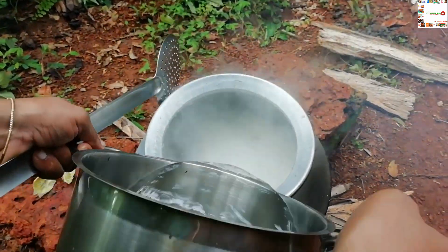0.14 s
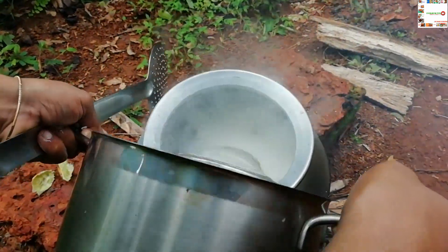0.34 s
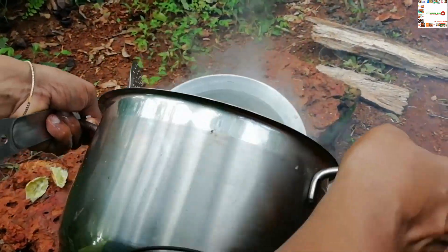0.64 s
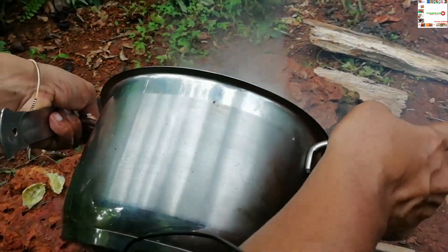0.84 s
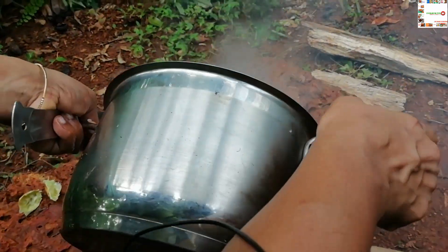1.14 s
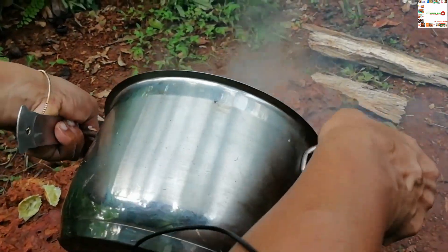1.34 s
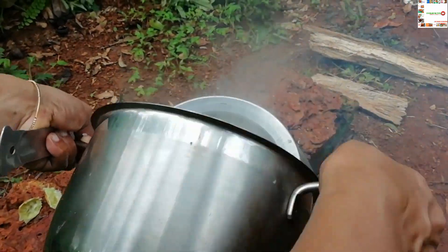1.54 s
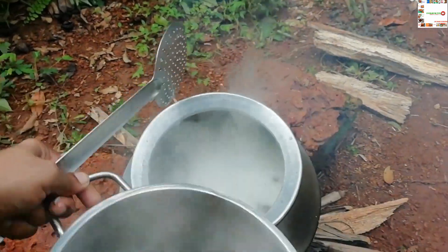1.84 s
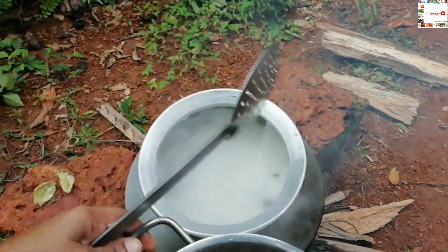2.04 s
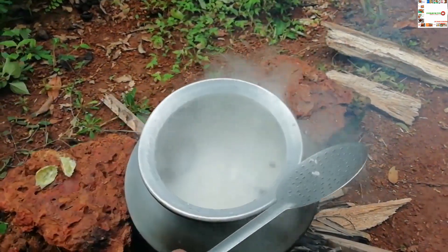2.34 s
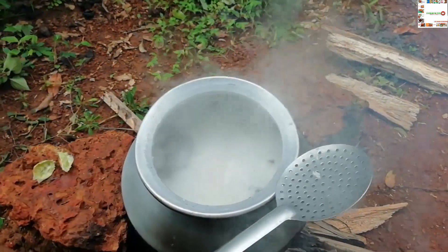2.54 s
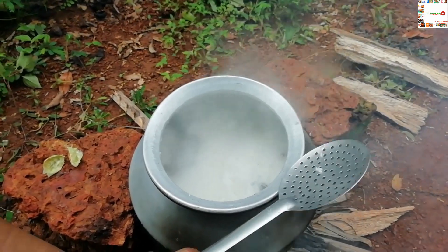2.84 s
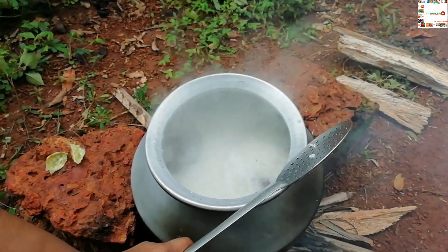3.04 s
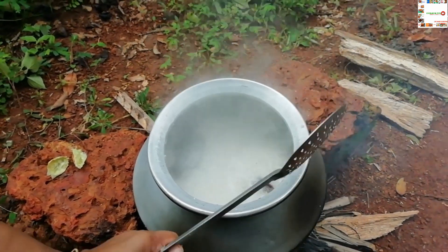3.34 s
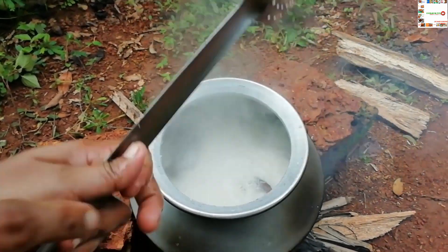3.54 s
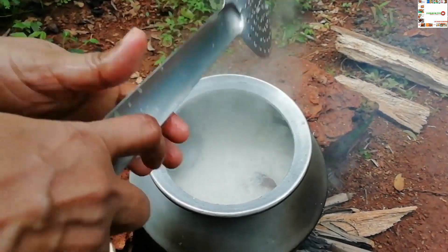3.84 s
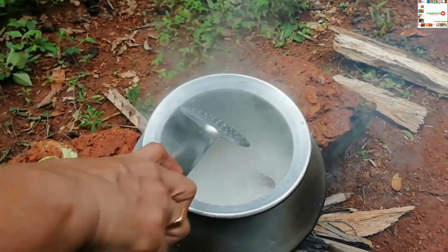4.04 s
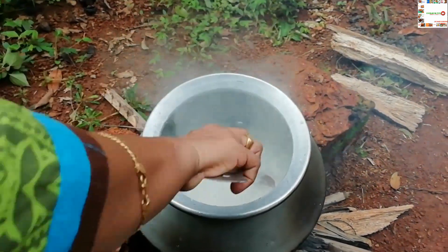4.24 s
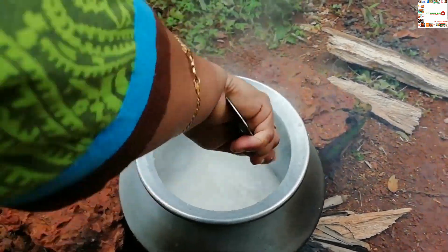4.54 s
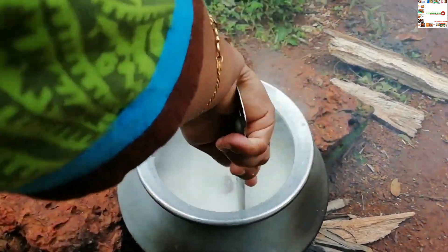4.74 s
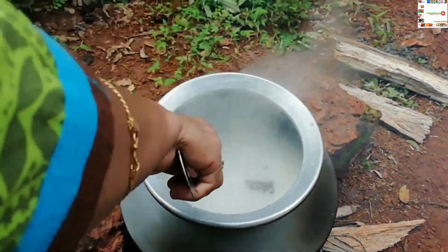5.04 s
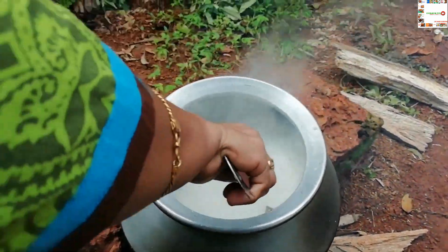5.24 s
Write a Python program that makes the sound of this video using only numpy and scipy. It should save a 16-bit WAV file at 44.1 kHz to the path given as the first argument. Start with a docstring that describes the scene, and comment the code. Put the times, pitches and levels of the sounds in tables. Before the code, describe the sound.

Water is poured from a steel pot into a simmering pot with splashes and glugs, then metal clangs and rattles, and a ladle knocks and stirs.

```python
"""Outdoors, hot water is tipped from a steel pot into an aluminium pot of boiling rice: swarms of
bubbles ring in a hollow, with glugs, slaps and drips, and the rest runs back as the pot is righted.
A perforated ladle is dropped across the rim, then the empty steel pot clatters down and rattles:
decaying modes. The ladle knocks the rim and stirs the rice. Throughout, light wind buffets the close
microphone as low filtered noise, over a faint hiss."""
import sys
import numpy as np
from scipy import signal
from scipy.fft import rfft, irfft
from scipy.io import wavfile
from scipy.ndimage import uniform_filter1d

SR = 44100
rng = np.random.default_rng(int(sys.argv[2]) if len(sys.argv) > 2 else 0)


def file_out(sig):
    """Save sig as 16-bit WAV at sys.argv[1]."""
    # one column per channel
    cols = np.atleast_2d(sig).T
    # limit, then scale
    lim = np.clip(cols, -1, 1)
    pcm = np.round(lim * 32767).astype(np.int16)
    wavfile.write(sys.argv[1], SR, pcm)


N = 237302
TIME = np.arange(N) / SR
USUAL_FLOW_DB = -50  # the layers' growth with flow is reckoned from here

# The crowded higher modes of thin metal. Each row: frequency in Hz, density in dB per Hz.
CLASH_SPECTRUM = [(600, -21), (1000, -34.5), (1250, -9.5), (1700, -1), (2450, -8.5), (3100, -1.5),
                  (4500, -6), (5200, -7), (6000, -2.5), (6500, -7.5), (7400, -2.5), (9300, -5),
                  (10400, -14.5), (15000, -17)]


def gain_of(db):
    """A level in decibels is twenty times the logarithm of an amplitude factor."""
    return 10 ** (np.asarray(db) / 20)


def evened(x):
    """Normalization: the root mean square is brought to 1."""
    return x / np.sqrt(np.mean(x ** 2) + 1e-20)


def steadied(x, span_s):
    """Envelope division: the running rms is held near 1 while grain faster than the span remains."""
    return x / np.sqrt(abs(uniform_filter1d(x ** 2, int(span_s * SR))) + 1e-9)


def coloured(x, points, tilt_db=0):
    """Linear filtering: x is given a spectrum, tilted in dB per octave about 3 kHz, at rms 1."""
    hz = np.fft.rfftfreq(len(x), 1 / SR) + 1  # the offset avoids the logarithm of zero
    point_hz, point_db = np.transpose(points)
    octaves_above = np.maximum(np.log2(hz / point_hz[-1]), 0)
    octaves_below = np.maximum(np.log2(point_hz[0] / hz), 0)
    shape_db = np.interp(np.log(hz), np.log(point_hz), point_db)
    shape_db = shape_db - 24 * (octaves_above + octaves_below) + tilt_db * np.log2(hz / 3000)
    return evened(irfft(rfft(x) * gain_of(shape_db), len(x)))


def dying(t, t60):
    """Exponential decay: the amplitude falls 60 dB in t60 seconds."""
    return np.exp(-np.log(1000) * t / t60)


def add(mix, s, sound):
    """Superposition: a sound is summed into the mix from s seconds on."""
    part = mix[max(round(s * SR), 0):][:len(sound)]
    part += sound[:len(part)]


def resonate(x, hz, width):
    """Resonance of unit gain: a one-pole filter in a frame that rotates with the frequency curve."""
    turn = np.exp(2j * np.pi * np.cumsum(hz) / SR)
    radius = np.exp(-np.pi * width / SR)
    return 2 * (turn * signal.lfilter([1 - radius], [1, -radius], x / turn)).real


def bubble(hz, t60, rise, onset_cycles=0.92):
    """Bubble oscillation: a damped sine whose pitch rises (octaves per s) as it nears the surface."""
    t = TIME[:int(t60 * SR) + 16]
    phase = 2 * np.pi * np.cumsum(hz * 2 ** (rise * t)) / SR
    onset = 1 - np.exp(-(t * hz / onset_cycles) ** 2)
    return np.sin(phase) * dying(t, t60) * onset


def gulps(rows, onset_cycles, rise_octaves):
    """Damped oscillation: short rounded rings, their pitch rising by a set interval within t60."""
    out = np.zeros(N)
    for s, db, hz, t60 in rows:
        add(out, s, gain_of(db) * bubble(hz, t60, rise_octaves / t60, onset_cycles))
    return out


def outdoor_air():
    """Stationary broadband noise: a faint outdoor hiss, strongest in its low frequencies."""
    # Each row: frequency in Hz, density in dB per Hz.
    air_spectrum = [(120, -17.5), (200, -2.5), (294, -4.5), (380, -5), (601, -16), (671, -7.5), (821, -9.5),
                    (968, -7), (2650, -14), (8740, -21), (10700, -26.5), (14900, -30), (16000, -40.5)]
    return gain_of(-56) * coloured(rng.standard_normal(N), air_spectrum)


def wind(gust_heave_db=5.5, calm_flutter_db=-57, gust_edge_s=0.077):
    """Turbulence: eddies push the microphone in slow heaves, with a flutter that rises in each gust."""
    # Slow buffeting and faster flutter. Each row: frequency in Hz, density in dB per Hz.
    buffet_spectrum = [(3, -13.5), (9, 5), (18, 1.5), (30, -11), (55, -18), (90, -42)]
    flutter_spectrum = [(30, -4.5), (60, 5.5), (110, -4.5), (180, -10.5), (300, -24), (600, -36)]
    # The breeze swells and sinks. Each row: time in seconds, buffeting level in dB.
    breeze = [(0.0, -48), (0.55, -45), (1.7, -43.5), (2.45, -33), (2.9, -38.5), (3.7, -32), (4.1, -37.5),
              (4.85, -34), (5.38, -51.5)]
    # Gusts that flutter on the microphone. Each row: start in seconds, length in seconds, level in dB.
    gust_rows = [(0.498, 0.2, -50), (0.853, 0.31, -47), (1.246, 0.21, -41.5), (2.345, 0.35, -54),
                 (3.091, 0.867, -44), (4.137, 0.43, -46.5), (4.68, 0.16, -53)]
    gusts = np.zeros(N)
    for start, length, db in gust_rows:
        to_nearer_end = np.minimum(TIME - start, start + length - TIME)
        gusts += gain_of(db) * np.clip(to_nearer_end / gust_edge_s, 0, 1)
    heave = gain_of(np.interp(TIME, *np.transpose(breeze)))
    slow, fast = rng.standard_normal((2, N))
    buffeting = steadied(coloured(slow, buffet_spectrum), 0.17)
    flutter = steadied(coloured(fast, flutter_spectrum), 0.12)
    # powers add
    buffeting *= np.hypot(heave, gain_of(gust_heave_db) * gusts)
    flutter *= np.hypot(gain_of(calm_flutter_db), gusts)
    return buffeting + flutter


def puffs():
    """Damped oscillation: each sudden puff of air is a low ring of steady pitch."""
    # Each row: start in seconds, level in dB, pitch in Hz, t60 in seconds.
    puff_rows = [(1.308, -28.5, 104, 0.075), (1.348, -26, 66.4, 0.057), (2.574, -6, 32.7, 0.11),
                 (3.163, -19.5, 66.6, 0.068)]
    return gulps(puff_rows, onset_cycles=0.36, rise_octaves=0)


def clash_colour(bright_hz, lift_db=5, octaves=0.58):
    """Modal excitation: the point of contact favours one group of the crowded modes."""
    point_hz, point_db = np.transpose(CLASH_SPECTRUM)
    hz = np.geomspace(point_hz[0], point_hz[-1], 128)
    favour_db = lift_db * np.exp(-(np.log2(hz / bright_hz) / octaves) ** 2)
    return np.transpose([hz, np.interp(np.log(hz), np.log(point_hz), point_db) + favour_db])


def scraping():
    """Friction excitation: uneven slips keep the thin metal sounding between the blows."""
    # Metal dragging over metal. Each row: start in seconds, length in seconds, level in dB,
    # brightest frequency in Hz.
    scrape_rows = [(2.684, 0.2, -30.5, 1310), (3.054, 0.12, -38.5, 1460), (3.122, 0.08, -49.5, 2150)]
    out = np.zeros(N)
    size = 16384
    for s, length, db, bright_hz in scrape_rows:
        # tiny rebounds make the level of the contact uneven
        unevenness = coloured(rng.standard_normal(size), [(40, 9.5), (300, -13.5), (700, -7)])
        slips = rng.standard_normal(size) * evened(gain_of(5 * unevenness))
        sound = coloured(slips, clash_colour(bright_hz, lift_db=6.0), tilt_db=-4.5)
        sound = sound[:int(length * SR)]
        add(out, s, gain_of(db) * sound * signal.windows.tukey(len(sound), .4))
    return out


def struck(modes, t, length, build_s, chance_db, detune=.0015):
    """Modal superposition: close pairs of modes beat and decay, sooner when a hand damps the object."""
    hz, db, t60 = np.transpose(modes)[:, :, None]
    phase = rng.random(hz.shape)  # in turns
    # each contact weights and detunes the modes a little
    strength, shift, split = rng.standard_normal((3, *hz.shape))
    turns = hz * (1 + detune * shift) * t + phase
    pair = np.sin(2 * np.pi * turns) + .35 * np.cos(2 * np.pi * (turns + 25 * split * t))
    onset = 1 - np.exp(-(t / build_s) ** 2)
    partials = gain_of(db + chance_db * strength) * pair * onset
    return (partials * dying(t, t60 * length)).sum(0)


def metal(thud_db=-11, thud_t60=0.089, shimmer_t60=0.36, uneven_db=2.0):
    """Impact excitation: a blow wakes a clash, a thud, a shimmer and clear modes; harder is brighter."""
    # Metal blows. Each row: start in seconds, strength in dB, t60 of the clash in seconds,
    # its brightest frequency in Hz, kind of contact.
    blows = [(2.2548, -13, 0.12, 7300, "ladle lands"), (2.3131, -5.5, 0.042, 4570, "ladle bounces"),
             (2.324, -14.5, 0.11, 3800, "ladle settles"), (2.6663, -8.5, 0.063, 1330, "steel pot lands"),
             (2.680, -14, 0.067, 1300, "steel pot lands"), (2.699, -21, 0.15, 2000, "steel pot lands"),
             (2.7447, -16, 0.043, 7500, "steel pot lands"), (2.7723, -16, 0.08, 2105, "steel pot lands"),
             (2.8124, -20, 0.048, 1690, "steel pot lands"), (2.8262, -6, 0.041, 1590, "both pots rattle"),
             (2.8539, -11.5, 0.12, 1620, "both pots rattle"), (2.868, -16, 0.14, 3630, "both pots rattle"),
             (3.004, -34.5, 0.41, 7740, "steel pot lands"), (3.0397, -13.5, 0.059, 1680, "steel pot rattles"),
             (3.066, -22, 0.05, 2120, "dull bump"), (3.097, -19.5, 0.084, 1570, "steel pot rattles"),
             (3.117, -23.5, 0.041, 1550, "steel pot rattles"), (3.2009, -15.5, 0.085, 1720, "steel pot rattles"),
             (3.328, -28, 0.053, 1770, "both pots rattle"), (4.187, -8.5, 0.032, 2930, "knock inside"),
             (4.1893, -13, 0.036, 3180, "dull bump")]
    # Ways the metal meets. Each entry: tilt in dB per octave, thud in dB, thud pitch in Hz, shimmer in dB,
    # ring in dB of the ladle, of the steel pot and of the rice pot, ring length as a factor (short when
    # a hand damps it). Levels are relative to the blow, the thud's before the common thud_db.
    contacts = {"ladle lands": (3.0, -9.5, 388.5, -19.5, 10.5, -48.5, -43.5, 1.57),
                "ladle bounces": (-3, -6, 604, -24, -21.5, -25.5, -22, 1.6),
                "ladle settles": (-1.1, -4.5, 784, -13, -10, -45, -21.5, 0.7),
                "steel pot lands": (-0.5, -3.5, 621, -21, -39.5, -8.5, -22.5, 0.77),
                "both pots rattle": (-3, -19.5, 673, -21, -47.5, -24, -21.5, 1.53),
                "steel pot rattles": (-1.5, -6.5, 562, -22, -31, -10.5, -15, 0.8),
                "knock inside": (-2.5, 1, 790, -22, -51, -38, -14, 1.01),
                "dull bump": (-2.2, 1, 382, -22.5, -55, -47.5, -27, 0.9)}
    # Modes of each object. Each row: frequency in Hz, level in dB, t60 in seconds before the ring length.
    ladle_modes = [(1246, 0, .085), (1238, -34, .7), (2492, -31, .35), (2858, -22, .48), (3947, -28, .25),
                   (4128, -27, .33), (4412, -5, .055), (4407, -25, .42), (5010, -23, .13), (5287, -24, .13),
                   (5713, -20, .13), (5959, -18, .12), (6737, -11, .12), (6869, -28, .33), (7616, -17, .1),
                   (8103, -16, .09), (8255, -27, .2), (9167, -18, .06)]
    steel_pot_modes = [(545, -15, 0.1), (889, -17, 0.52), (1150, -5, 0.077), (1250, -6, 0.28),
                       (1350, 3, 0.14), (1389, 0.5, 0.12), (1643, -7.5, 0.16), (1890, -4.5, .15),
                       (2087, -4, 0.22), (2790, -5, 0.13), (3064, 4.5, 0.071), (3510, -12.5, 0.25),
                       (4350, -32, 0.37), (4414, -17.5, 0.45), (4810, -3.5, 0.085), (6040, -10.5, 0.065),
                       (5900, -12.5, 0.29), (7220, -2.5, 0.13), (7830, 1.5, 0.085)]
    rice_pot_modes = [(407, -8, 0.056), (797, -6.5, 0.059), (1120, -16.5, 0.33), (1290, -8.5, 0.23),
                      (1494, -14, .2), (1605, -4, 0.18), (1685, -14.5, 0.43), (1910, -30, 0.21),
                      (2125, -17.5, 0.16), (2950, 4, 0.047), (2860, 4, 0.025), (3280, -6, 0.18),
                      (3600, 1.5, 0.077), (3680, -11, .12), (4525, -10.5, 0.26), (4550, -10, .12),
                      (5200, -12.5, .16), (5630, -6.5, 0.2), (7570, 1, 0.073), (7440, -13, 0.14),
                      (8470, -6.5, 0.18), (8720, -9, 0.18)]
    # Spectrum of the thud. Each row: frequency as a multiple of its pitch, density in dB per Hz.
    thud_spectrum = [(.15, -4), (.5, -16), (1, 3), (1.35, -12), (2, -3.5), (4, -16.5)]
    usual_blow_db = -13
    harder_tilt = 0.21  # dB per octave brighter for each dB of strength
    out, t = np.zeros(N), TIME[:24576]
    for s, db, t60, bright_hz, contact in blows:
        contact_tilt_db, low_db, thud_hz, shimmer_db, ladle_db, steel_db, rice_db, length = contacts[contact]
        tilt_db = contact_tilt_db + harder_tilt * (db - usual_blow_db)
        bright, dull, late = rng.standard_normal((3, len(t)))
        colour = clash_colour(bright_hz)
        colour[:, 1] += uneven_db * rng.standard_normal(len(colour))  # no two blows wake the same modes
        clash = coloured(bright, colour, tilt_db) * dying(t, t60)
        thud = coloured(dull, np.array(thud_spectrum) * [thud_hz, 1]) * dying(t, thud_t60)
        thud *= gain_of(thud_db + low_db)
        shimmer = coloured(late, CLASH_SPECTRUM, tilt_db - 2.5) * dying(t, shimmer_t60)
        shimmer *= gain_of(shimmer_db)
        ladle = gain_of(ladle_db) * struck(ladle_modes, t, length, build_s=0.0059, chance_db=0.0)
        steel = gain_of(steel_db) * struck(steel_pot_modes, t, length, build_s=0.0021, chance_db=3.5)
        rice = gain_of(rice_db) * struck(rice_pot_modes, t, length, build_s=0.001, chance_db=-3.5)
        add(out, s, gain_of(db) * (clash + thud + shimmer + ladle + steel + rice))
    return out


def singing_wall(width_hz=180):
    """Narrow-band resonance: water swirling in the tilted steel pot sets its wall singing in fuzzy glides."""
    # Each row: start in seconds, end in seconds, level in dB, first pitch in Hz, last pitch in Hz.
    singing_rows = [(0, 0.41, -62, 1640, 1700), (.76, 1.008, -51.5, 1390, 1430),
                    (1.77, 2.2, -58, 2950, 2630), (1.86, 2.228, -54.5, 1880, 1620)]
    out = np.zeros(N)
    for start, end, db, first_hz, last_hz in singing_rows:
        size = int((end - start) * SR)
        glide = np.linspace(first_hz, last_hz, size)
        tone = resonate(rng.standard_normal(size), glide, width_hz)
        tone = resonate(tone, glide, width_hz)
        add(out, start, gain_of(db) * evened(tone) * signal.windows.tukey(size, .4))
    return out


def bubbles(low_hz, high_hz, per_s, cycles, spread_db, count=24):
    """Random superposition: a swarm of small bubbles at chance moments, most faint and a few large."""
    out = np.zeros(N)
    for hz in np.geomspace(low_hz, high_hz, count):
        place, chance = rng.random((int(per_s * N / SR / count) + 1, 2)).T
        strength = gain_of(spread_db * np.minimum(-np.log(1 - chance), 4))
        train = np.bincount((place * N).astype(int), strength, N)
        t60 = cycles * rng.uniform(0.21, 2.36) / hz
        ring = bubble(hz, t60, 0.12 / t60)
        out += signal.oaconvolve(train, ring / np.linalg.norm(ring) * np.sqrt(hz))[:N]
    return evened(out)


def water(flow_db, hollow_hz, deep_db, splash_db, spray_db, spray_growth, hollow_db, hollow_growth,
          hollow_width, gush_db, lumpy_db):
    """Bubble noise and cavity resonance: clumped bubbles ring the pot's hollow; layers grow with the flow."""
    # Spectra of drops, mist, hollow and gurgle. Each row: frequency in Hz, density in dB per Hz.
    splash_spectrum = [(900, -37.5), (1800, -9), (2500, -2.5), (4000, -1.5), (5500, -3), (7000, -12.5),
                       (10000, -24)]
    spray_spectrum = [(3500, -43), (5500, -10), (7000, 2.5), (9200, 1), (10300, -13.5), (15000, -14),
                      (16500, -25.5)]
    hollow_spectrum = [(300, -22), (700, -5.5), (1100, -8), (2200, -7), (3200, -12.5), (5000, -30)]
    churn_spectrum = [(100, 8.5), (230, -9.5), (350, 3.5), (480, -7.5), (700, -20), (1200, -30)]
    lumps = coloured(rng.standard_normal(N), [(10, -1), (70, -15.0), (200, -13)])
    clumps = gain_of(lumpy_db * lumps)
    drops = coloured(bubbles(1700, 7000, 4500, 36, 3.7, count=40) * clumps, splash_spectrum)
    mist = coloured(bubbles(5000, 15500, 6000, 24, 3.6) * clumps, spray_spectrum)
    gush = coloured(bubbles(600, 3600, 2000, 14, 3.8), hollow_spectrum)
    ringing = resonate(gush, hollow_hz, hollow_width)
    ringing = evened(resonate(ringing, hollow_hz, hollow_width))
    cavity = ringing + gain_of(gush_db) * gush
    gurgle = coloured(bubbles(222.0, 855, 300, 10.0, 2.8), churn_spectrum)
    excess_db = flow_db - USUAL_FLOW_DB
    layers = [(drops, flow_db + splash_db),
              (mist, spray_db + spray_growth * excess_db),
              (cavity, hollow_db + hollow_growth * excess_db),
              (gurgle, deep_db)]
    return sum(steadied(x, 0.095) * gain_of(db) for x, db in layers)


def stream(points):
    """Interpolation of a flow: its level and hollow pitch, falling 100 dB per second outside its span."""
    s, flow_db, hollow_hz = np.transpose(points)
    outside_s = abs(TIME - np.clip(TIME, s[0], s[-1]))
    return np.interp(TIME, s, flow_db) - 100 * outside_s, np.interp(TIME, s, hollow_hz)


def stirring(churn_db=-5, attack_s=0.0048, settle_t60=0.13):
    """Forced motion and decay: each stroke moves the water at once, keeps it up and lets it settle."""
    # Strokes of the ladle through the rice. Each row: start in seconds, length in seconds, flow in dB,
    # pitch of the hollow in Hz, deep churning in dB before churn_db.
    strokes = [(4.49, 0.17, -38.5, 1880, -45.5), (4.689, 0.02, -42, 1780, -31),
               (4.777, 0.063, -46, 1780, -29), (4.91, 0.11, -54.5, 2190, -61),
               (5.028, 0.33, -74.5, 1590, -69), (5.288, 0.013, -61.5, 1760, -44)]
    flow, deep = np.full((2, N), 1e-6)  # a floor for the logarithm
    for start, length, db, _, deep_db in strokes:
        attack = np.clip((TIME - start) / attack_s, 0, 1)
        push = attack * dying(np.maximum(TIME - start - length, 0), settle_t60)
        flow = flow + gain_of(db) * push
        deep = deep + gain_of(deep_db) * push
    start, length, _, hz, _ = np.transpose(strokes)
    hollow_hz = np.interp(TIME, start + length / 2, hz)
    return water(20 * np.log10(flow), hollow_hz, 20 * np.log10(deep) + churn_db, splash_db=-2.5,
                 spray_db=-56, spray_growth=0.39, hollow_db=-48.5, hollow_growth=0.7,
                 hollow_width=580, gush_db=-17.5, lumpy_db=2.5)


def dripping():
    """Bubble entrainment: each last drop off the lip traps a small bubble that plops, rising in pitch."""
    # Each row: start in seconds, level in dB, pitch in Hz, t60 in seconds, rise in octaves per second.
    drips = [(1.447, -37, 1930, 0.032, 2), (1.467, -39.5, 3340, 0.027, 2), (1.591, -39, 1920, 0.045, 3),
             (2.051, -37, 956, 0.18, 10.5)]
    out = np.zeros(N)
    for s, db, hz, t60, rise in drips:
        add(out, s, gain_of(db) * bubble(hz, t60, rise, onset_cycles=3.5))
    return out


def backwash(churn_db=-8):
    """Bubble noise in a cavity: the rest of the water slops back as the steel pot is righted."""
    # Each row: time in seconds, flow in dB, pitch of the hollow in Hz.
    backwash_points = [(1.75, -60, 1820), (1.87, -53, 1480), (1.94, -41.5, 1340), (2.02, -54, 1680),
                       (2.23, -58.5, 1650)]
    flow_db, hollow_hz = stream(backwash_points)
    return water(flow_db, hollow_hz, flow_db + churn_db, splash_db=-0.5,
                 spray_db=-53.5, spray_growth=1.68, hollow_db=-54.0, hollow_growth=0.99,
                 hollow_width=700, gush_db=-3, lumpy_db=1.5)


def glugs():
    """Bubble oscillation: large air pockets close and ring low, rising in pitch."""
    # Each row: start in seconds, level in dB, pitch in Hz, t60 in seconds.
    glug_rows = [(.625, -29.5, 355, 0.039), (.657, -25, 258, 0.028), (.731, -29.5, 430, 0.025),
                 (.897, -17.5, 344, 0.019), (.982, -34, 425, 0.042), (1.073, -29, 388, 0.034),
                 (1.401, -31, 210, 0.027), (1.891, -23, 286, 0.018), (4.492, -21, 365, 0.024),
                 (4.574, -22.5, 425, 0.071), (4.621, -22.5, 424, 0.097), (4.673, -24.5, 368, 0.072),
                 (4.703, -21, 344, 0.077), (4.789, -31, 329, 0.15), (4.795, -35, 200, 0.035),
                 (4.790, -24.5, 717, 0.057), (4.828, -33, 380, 0.088), (4.852, -24.5, 340, 0.05)]
    return gulps(glug_rows, onset_cycles=0.54, rise_octaves=0.14)


def spats(crest_db=6, dulling_db=-12, octaves=0.57, t60=0.02):
    """Impact noise: each slap of water or small tap is a short burst about its own pitch, dulled on top."""
    # Each row: start in seconds, peak in dB (nominal, crest_db above the burst's rms), centre in Hz.
    spat_rows = [(0.2813, -35.5, 6460), (0.626, -22, 6400), (0.6288, -17, 7160), (0.677, -28, 8250),
                 (0.7823, -26, 5240), (0.801, -26.5, 3100), (1.1077, -32, 6240), (1.125, -23.5, 4570),
                 (1.199, -25.5, 7400), (1.365, -29.5, 7250), (1.400, -36, 745), (1.83, -23, 1260),
                 (1.831, -25, 5500), (1.9711, -23.5, 3220), (2.049, -29.5, 1200), (2.6172, -25.5, 4340),
                 (4.4923, -23.5, 2240), (4.641, -23, 3300), (4.71, -22, 2380), (4.833, -25.5, 2750),
                 (4.854, -21, 6050), (4.993, -27, 3120), (5.293, -31, 1460)]
    out, t = np.zeros(N), TIME[:4096]
    hz = np.geomspace(100, 16000, 64)
    top_db = dulling_db * np.clip((hz - 9300) / 1200, 0, 1)
    for s, db, centre_hz in spat_rows:
        band_db = top_db - 6 * abs(np.log2(hz / centre_hz) / octaves) ** 1.42
        burst = coloured(rng.standard_normal(len(t)), np.transpose([hz, band_db]))
        add(out, s, gain_of(db - crest_db) * burst * dying(t, t60))
    return out


def first_sheet(start=0.31, fullest=0.51, end=0.59, db=-43.5):
    """Broadband noise: the first smooth sheet of water lands with a rush that swells and stops."""
    spectrum = [(450, -21), (850, -2.0), (1100, -4), (1900, -2), (2600, -15.5), (5000, -11), (8000, -38)]
    rush = coloured(rng.standard_normal(N), spectrum)
    return gain_of(db) * rush * np.interp(TIME, [start, fullest, end], [0, 1, 0])


def plinks(flow_db, start=0.63, end=1.64, db=-55, growth=0.33):
    """Sparse bubble oscillation: larger drops ring above the stream and remain as it thins to drips."""
    drops = steadied(bubbles(1870, 4700, 90, 40, 4.0, count=30), 0.29)
    falling = np.interp(TIME, [start - .05, start, end, end + .05], [0, 1, 1, 0])
    return drops * falling * gain_of(db + growth * (flow_db - USUAL_FLOW_DB))


def pouring(churn_db=-52, churn_growth=0.85):
    """Bubble noise in a cavity: the stream plunges into the rice water and churns it."""
    # The stream into the rice pot. Each row: time in seconds, flow in dB, pitch in Hz of the hollow
    # over the water.
    pour_points = [(0.05, -67.5, 1590), (0.22, -75, 1630), (0.29, -54.5, 1640), (0.4, -66, 1670),
                   (0.55, -48.5, 1480), (0.63, -43.5, 1820), (0.68, -53, 1720), (0.76, -56.5, 1580),
                   (0.79, -46, 1450), (0.93, -51.5, 1390), (1.01, -59.5, 2340), (1.13, -48.5, 2370),
                   (1.23, -48.5, 2300), (1.43, -62, 1970), (1.71, -65, 1840)]
    flow_db, hollow_hz = stream(pour_points)
    deep_db = churn_db + churn_growth * (flow_db - USUAL_FLOW_DB)
    plunge = water(flow_db, hollow_hz, deep_db, splash_db=1.0,
                   spray_db=-50, spray_growth=0.84, hollow_db=-50.5, hollow_growth=0.86,
                   hollow_width=450, gush_db=-18, lumpy_db=4.5)
    return plinks(flow_db) + plunge


def in_pot(x, wet_db=-9, t60=0.078):
    """Reverberation: quick, decaying reflections between the pot's walls follow the direct sound."""
    t = TIME[:8192]
    echoes = rng.standard_normal(len(t)) * dying(t, t60) * (t > .001)
    return x + gain_of(wet_db) * signal.oaconvolve(x, echoes / np.linalg.norm(echoes))[:N]


def scene():
    """Superposition: hiss, wind, metal and water add, the liquid with the pot's reflections."""
    surroundings = outdoor_air() + wind() + puffs()
    metalwork = scraping() + metal() + singing_wall()
    liquid = stirring() + dripping() + backwash() + glugs() + spats() + first_sheet() + pouring()
    return (surroundings + metalwork + in_pot(liquid))[None]


def record(dry, ceiling=0.82, edge_hz=15900):
    """Saturation and band limiting: the loudest blows are rounded off, then the top is cut."""
    rounded = dry / (1 + (dry / ceiling) ** 4) ** (1 / 4)
    lowpass = signal.firwin(255, edge_hz, window=("kaiser", 9), fs=SR)
    return signal.oaconvolve(rounded, lowpass[None], "same")


dry = scene()
out = record(dry)
file_out(out)
```